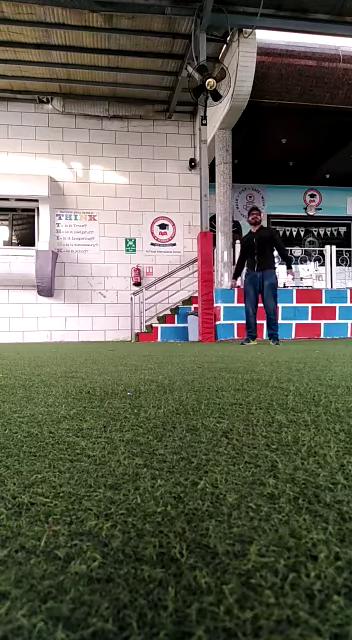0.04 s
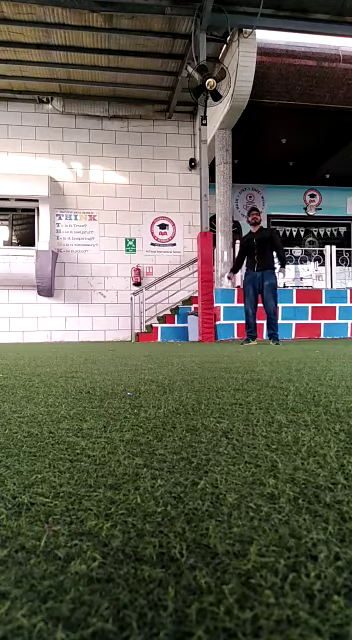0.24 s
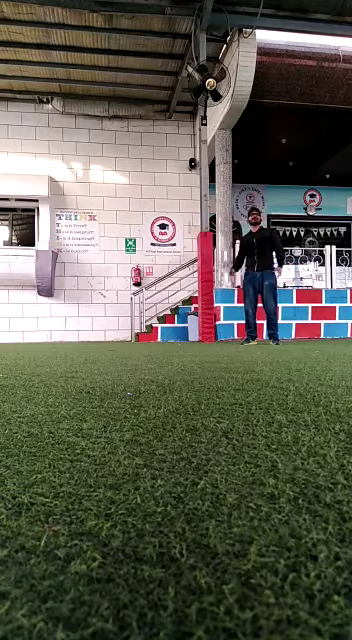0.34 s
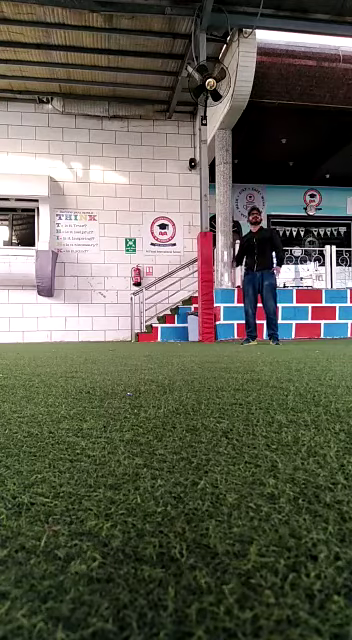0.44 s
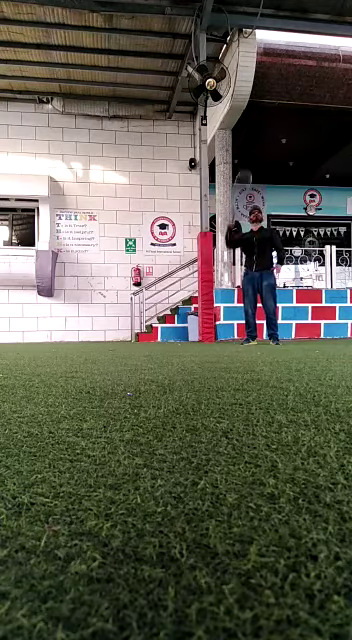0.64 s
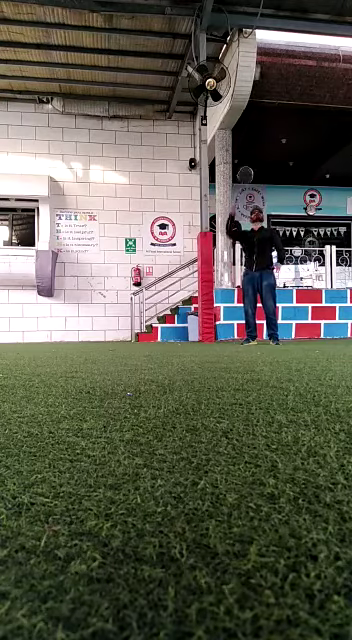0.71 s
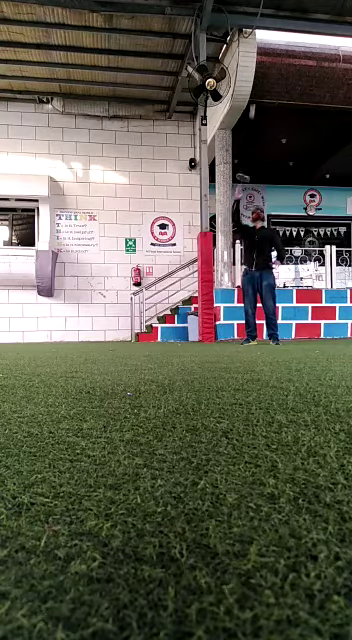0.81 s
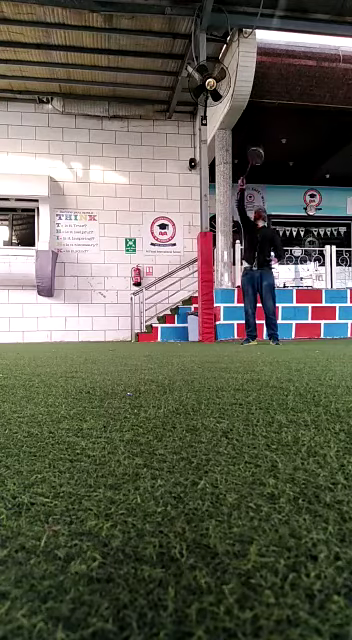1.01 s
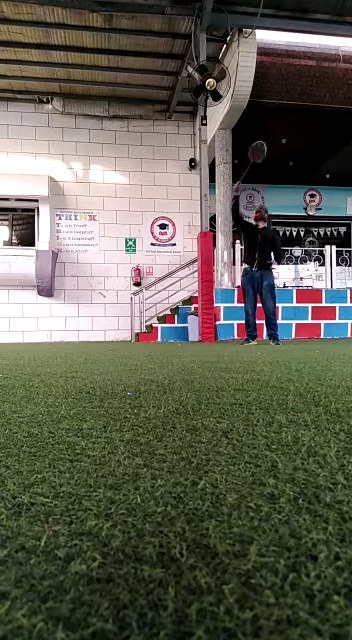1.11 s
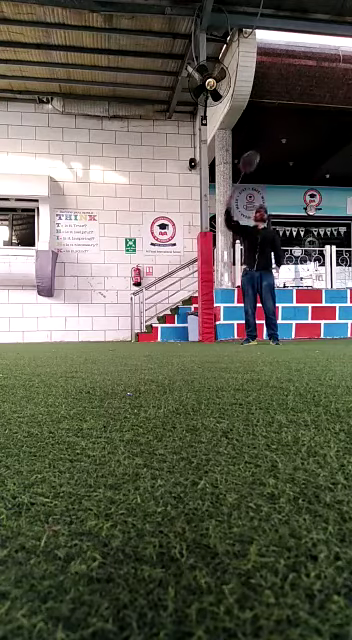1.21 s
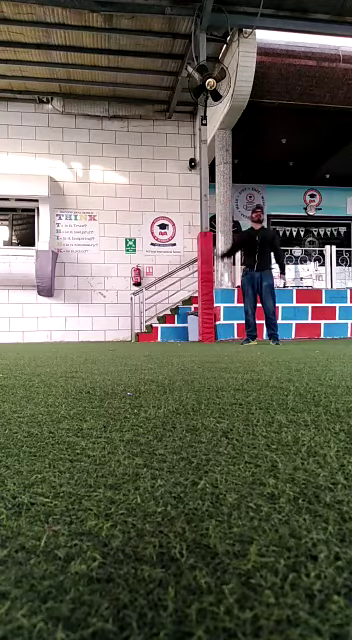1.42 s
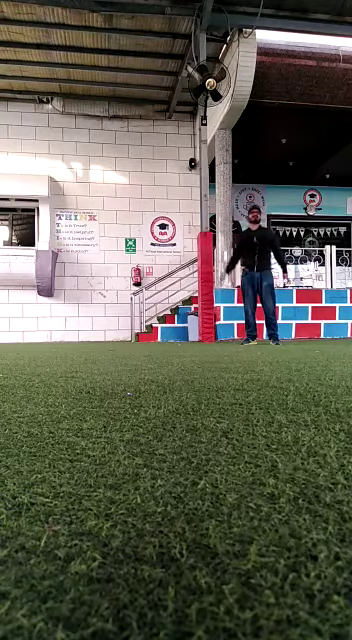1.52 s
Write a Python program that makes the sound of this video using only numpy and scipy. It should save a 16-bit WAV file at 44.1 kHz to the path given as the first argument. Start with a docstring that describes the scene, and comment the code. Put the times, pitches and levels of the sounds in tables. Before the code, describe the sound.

A badminton racket strikes a shuttlecock close by at about 0.2 seconds, just after a faint swish and tick. The sharp crack has a hollow pock and a short ring, and echoes through the hall for about a second. A softer, more distant return comes near 1 second, also echoing. Shoes scuff faintly on turf around 1.3 seconds. A low rumble of distant traffic and fans runs underneath.

```python
"""A badminton hall with a tin roof: a hard stroke close by, then a softer return from across the court.
Each stroke is a crack of cork on strings, a hollow pock and a short ring of the racket, and the hall
echoes it. Rackets swish and tick, shoes scuff the turf, and distant traffic and fans rumble underneath.
The pocks and rings are fading pure tones; the other sounds are shaped noise."""
import sys
import numpy as np
from scipy import signal
from scipy.fft import rfft, irfft, next_fast_len
from scipy.io import wavfile
from scipy.ndimage import uniform_filter1d, map_coordinates

SR = 44100
rng = np.random.default_rng(int(sys.argv[2]) if len(sys.argv) > 2 else 0)


def wav_out(sig):
    """Save sig, one row per channel (or a flat mono array), as 16-bit PCM at SR to the path in sys.argv[1]."""
    wavfile.write(sys.argv[1], SR, np.round(np.clip(np.atleast_2d(sig).T, -1, 1) * 32767).astype(np.int16))


N = 68355
T = np.arange(N) / SR
FFT_SIZE = next_fast_len(N + 8192)
HZ = np.fft.rfftfreq(FFT_SIZE, 1 / SR)

# The tone colour of each sound. Each row: frequency in Hz, boost or cut in dB.
RUMBLE_COLOUR = [(20, -37), (40, -23), (65, -3), (110, 1), (165, -8), (270, 2.5), (400, -5.5), (630, -9),
                 (1000, -15.5), (1500, -21.5), (2000, -29), (2600, -40), (4000, -45), (9000, -47),
                 (14000, -56)]
BOOM_COLOUR = [(40, -30), (75, -6), (110, 0), (135, -4), (180, -25), (500, -60)]
SCUFF_COLOUR = [(500, -15), (1200, -6), (2000, -1), (2700, 0), (4400, -7), (5200, -16), (6000, -8),
                (7200, -4), (8600, -9), (10700, -24), (13000, -45)]
SWISH_COLOUR = [(2000, -14), (4700, -4), (5800, -4), (7000, 0), (9000, -4), (13000, -24)]
TICK_COLOUR = [(1500, -30), (4200, -18), (6400, 0), (8500, 0), (11000, -13), (14000, -22)]
NEAR_CRACK_COLOUR = [(60, -2), (250, 12), (520, 9), (720, 5), (860, 13), (950, 1), (1200, 12), (2000, 6),
                     (2800, 9), (3700, 5), (5600, 9), (6900, 20), (8400, 20.5), (10400, 16), (12000, 4),
                     (13700, -3), (14800, -25)]
NEAR_HALL_COLOUR = [(30, -16), (70, 3), (130, 16), (200, 15), (260, 23), (340, 16), (420, 19), (650, 11),
                    (840, 12), (950, 7), (1200, 11), (1550, 11.5), (2200, 8.5), (2700, 9), (3050, 12),
                    (3300, 5), (3700, -3), (4100, 4), (4700, 2), (5600, 1), (6100, 11), (6900, 13.5),
                    (8400, 12), (10200, 6.5), (12000, -3), (14500, -21)]
SHUDDER_COLOUR = [(30, -35), (300, -10), (600, 7), (950, 0), (1400, 12), (2300, 13), (3200, 11), (3800, -1),
                  (5000, 4), (8000, 3), (13000, -18)]
FAR_CRACK_COLOUR = [(100, -14), (600, 7), (850, 5), (1000, -1), (1250, 6), (1800, -8), (2700, -8),
                    (3200, -26), (4000, -24), (4900, -4), (6000, -5), (7000, 2), (8500, -2), (12000, -11),
                    (14500, -18)]
FAR_HALL_COLOUR = [(30, -14), (100, 4), (300, 10), (600, 4), (950, -2), (1200, 3), (2000, -6), (3000, -3),
                   (3700, -10), (4600, -6), (5500, -6), (7000, 1.5), (9000, -3), (12000, -13), (14500, -22)]
# Swells of noise. Each row: peak time in seconds, level in dB, seconds to rise 20 dB, and to fall 20 dB.
BOOM_SWELLS = [(.15, -46, .06, .06), (.29, -42, .04, .12), (.42, -45, .08, .1), (.69, -42, .06, .25),
               (1.0, -45, .08, .25), (1.3, -43.5, .04, .35)]
SCUFF_SWELLS = [(.035, -67, .02, .03), (.145, -63, .02, .1), (1.18, -53, .03, .04), (1.212, -52, .015, .03),
                (1.278, -43.5, .04, .13)]
SWISH_SWELLS = [(.2, -56, .125, .02), (.78, -65, .12, .08), (.945, -66, .015, .05)]
# Where a sound sits. Each row: frequency in Hz, pan in dB (how much louder the left is than the right).
RUMBLE_PAN = [(100, .5), (300, 2.5), (700, 5), (1400, 8), (2500, 8), (6000, 0)]
HALL_PAN = [(100, .5), (400, 4), (1300, 5), (3000, 3.5), (7000, -1), (10000, 2), (14000, 4)]
# How alike the two ears hear noise. Each row: frequency in Hz, likeness (1 the same, 0 unrelated).
EAR_LIKENESS = [(130, .98), (280, .94), (620, .4), (1350, -.1), (3000, 0)]
# Racket ticks. Each row: start in seconds, level in dB, pan in dB.
RACKET_TICKS = [(.1605, -14, -6), (.775, -29, -3)]
# The strokes. Each holds: start in seconds, crack level and pan in dB, pock delay in seconds, pock pitch
# in Hz, pock level in dB, pock fade in seconds, the hall's slow echo against its quick one in dB.
# A fade (t60) is always the time taken to drop by 60 dB.
NEAR_STROKE = (.2062, -1.3, -2.2, .0061, 275, -13, .0105, -6.5)
FAR_STROKE = (.9699, -1.3, 3, .0004, 380, -20, .007, -2.5)
# Ringing strings and frame. Each row: pitch in Hz, level in dB, fade in seconds.
NEAR_RING = [(860, -31, .1), (1200, -36, .12), (1578, -30.5, .5), (2105, -33, .24), (2600, -36, .15),
             (3025, -27.5, .15), (6050, -33, .17), (6850, -25, .06), (7830, -22, .04), (8190, -25, .06),
             (8420, -22, .04), (10250, -28, .03)]
FAR_RING = [(1160, -36, .17), (1270, -40, .11), (2450, -56, .2), (6630, -47, .12), (7050, -28, .014)]
# Repeats of a crack: cork and feathers meet the strings again, or walls send it back.
# Each row: delay in seconds, level in dB.
STRING_SLAPS = [(.0009, -3), (.0032, -2), (.004, -5)]
WALL_ECHOES = [(.0035, -9), (.009, -11), (.0135, -7), (.016, -8), (.029, -10)]
# The hall's quick and slow echoes. Each row: frequency in Hz, fade in seconds.
QUICK_FADES = [(200, .4), (1500, .4), (7000, .38), (13000, .3)]
SLOW_FADES = [(200, 1.1), (1500, 1.05), (2200, 1.0), (3000, 1.0), (4800, 1.15), (7000, 1.03), (10000, .72),
              (13000, .55)]
# Hiss below these levels is turned down. Each row: frequency in Hz, threshold in dB.
HISS_THRESHOLDS = [(1500, -100), (2000, -80), (2700, -86), (3600, -85), (4700, -92), (6500, -89),
                   (9000, -89), (12000, -92)]

RACKET_PAN_DB = 3


def amp(db):
    """Turn decibels into a number to multiply by."""
    return 10 ** (np.asarray(db) / 20)


def along(points, hz=HZ):
    """Read a table between its rows, on a musical (log) frequency scale."""
    freqs, values = np.transpose(points)
    return np.interp(np.log(hz + 1), np.log(freqs + 1), values)


def pan(db):
    """Left and right gains that keep the total power the same."""
    gains = amp(np.array([[.5], [-.5]]) * db)
    return gains / np.sqrt(np.mean(gains ** 2, axis=0))


def filtered(x, response):
    """Multiply each frequency in x by its own gain."""
    return irfft(rfft(x, FFT_SIZE) * response, FFT_SIZE)[..., :N]


def colour(points):
    """A filter with this tone colour that never sounds ahead of its input."""
    cepstrum = irfft(np.log(amp(along(points))), FFT_SIZE)
    cepstrum[1:FFT_SIZE // 2] *= 2
    cepstrum[FFT_SIZE // 2 + 1:] = 0
    return np.exp(rfft(cepstrum))


def later(x, seconds):
    """Delay a sound."""
    n = int(np.clip(round(seconds * SR), 0, N - 1))
    return np.pad(x, [(0, 0), (n, 0)])[:, :N]


def fade(t60):
    """A level that drops 60 dB every t60 seconds."""
    return np.exp(-np.log(1000) * T / t60)


def unit_energy(x):
    """Scale to an average energy of 1 per channel."""
    return x / np.sqrt(np.mean(np.sum(x ** 2, axis=-1)) + 1e-20)


def room_noise():
    """White noise, alike at both ears in the bass and unrelated in the treble."""
    angle = np.arccos(np.clip(along(EAR_LIKENESS), -1, 1)) / 2
    mid, side = filtered(rng.standard_normal((2, N)), np.array([np.cos(angle), np.sin(angle)]))
    return np.array([mid + side, mid - side])


def rush(points):
    """Steady coloured noise with an average (rms) level of 1."""
    return unit_energy(filtered(room_noise(), amp(along(points)))) * np.sqrt(N)


def swells(rows, points):
    """Noise that swells and fades once for each row."""
    power = sum(amp(db - 20 * np.maximum((peak - T) / rise, (T - peak) / fall)) ** 2
                for peak, db, rise, fall in rows)
    return np.sqrt(power) * rush(points)


def burst(envelope, spikiness=.35):
    """A spiky run of tiny impacts whose level follows the envelope."""
    noise = room_noise()
    flicker = np.interp(T, T[::16], rng.standard_normal(N)[::16])
    impacts = noise * np.exp(spikiness * flicker) * envelope
    return np.array([unit_energy(side) for side in impacts])


def rumble(level_db=-41.8, sway_db=.7, sways_per_s=9):
    """Distant traffic and fans fill the hall with a swaying rumble and deep swells."""
    sway = map_coordinates(rng.standard_normal(64), [T * sways_per_s], mode="mirror")
    steady = amp(level_db + sway_db * sway) * rush(RUMBLE_COLOUR)
    return filtered(steady + swells(BOOM_SWELLS, BOOM_COLOUR), pan(along(RUMBLE_PAN)))


def scuffs_and_swishes():
    """Shoes scuff the turf and rackets swish through the air."""
    movement = swells(SWISH_SWELLS, SWISH_COLOUR) + swells(SCUFF_SWELLS, SCUFF_COLOUR)
    return filtered(movement, pan(along(HALL_PAN)))


def ticks(t60=.011):
    """A racket clicks lightly as it is handled."""
    return sum(amp(db) * pan(pan_db) * later(filtered(burst(fade(t60)), colour(TICK_COLOUR)), start)
               for start, db, pan_db in RACKET_TICKS)


def near_stroke(slap_t60=.007, left_lag_s=.0005, scatter_db=-8, shudder_t60=.095, shudder_rise_s=.004):
    """The hard stroke is a quick run of slaps on the strings, and makes the racket shudder."""
    direct = burst(fade(slap_t60))[:1]
    scattered = amp(scatter_db) * burst(fade(slap_t60))
    slap = np.vstack([later(direct, left_lag_s), direct]) + scattered  # the right ear hears it first
    crack = unit_energy(slap + sum(amp(db) * later(slap, delay) for delay, db in STRING_SLAPS))
    shake = burst(fade(shudder_t60) * (1 - np.exp(-T / shudder_rise_s)))
    shudder = pan(RACKET_PAN_DB) * filtered(shake, colour(SHUDDER_COLOUR))
    hit = stroke(NEAR_STROKE, NEAR_CRACK_COLOUR, NEAR_HALL_COLOUR, NEAR_RING, crack)
    return hit + later(shudder, NEAR_STROKE[0])


def stroke(row, crack_colour, hall_colour, tones, crack, ring_echo_db=-12):
    """Cork meets strings: a crack, a pock and a ringing racket, with the hall's echo."""
    start, crack_db, pan_db, pock_delay, pock_hz, pock_db, pock_t60, slow_db = row
    crack = amp(crack_db) * pan(pan_db) * filtered(crack, colour(crack_colour))
    hollow = later(pock(pock_hz, pock_db, pock_t60), pock_delay)
    ring = sum(amp(db) * fade(t60) * np.sin(2 * np.pi * (hz * T + rng.random((2, 1))))
               for hz, db, t60 in tones)
    echo = filtered(hall(slow_db), colour(hall_colour) + amp(ring_echo_db) * rfft(ring, FFT_SIZE))
    return later(crack + hollow + ring * pan(RACKET_PAN_DB) + echo, start)


def pock(hz, db, t60, pan_db=3.5, roof_delay_s=.0575, roof_db=-10):
    """A low, hollow tone swells and dies at once, then bounces back off the roof."""
    swell = T * fade(t60)
    tone = amp(db) * pan(pan_db) * swell / swell.max() * np.sin(2 * np.pi * hz * T)
    return tone + amp(roof_db) * later(tone, roof_delay_s)


def echo_tail(fades, gap_s=.024, rise_s=.005, size=256):
    """A wash of echoes builds up after a short gap; each frequency dies at its own speed."""
    hz, t, bands = signal.stft(room_noise(), SR, nperseg=size)
    decay = np.exp(-np.log(1000) * t / along(fades, hz)[:, None])
    wash = signal.istft(bands * decay, SR, nperseg=size)[1][:, :N]
    build_up = .5 + .5 * np.tanh((T - gap_s) / rise_s)
    return unit_energy(wash * build_up)


def hall(slow_db):
    """The hall answers a click: a quick echo from near walls and a slow one from the whole roof."""
    echoes = echo_tail(QUICK_FADES) + amp(slow_db) * echo_tail(SLOW_FADES)
    return filtered(unit_energy(echoes), pan(along(HALL_PAN)))


def far_stroke(click_t60=.012):
    """The soft return is one click, repeated by the walls around the player."""
    click = burst(fade(click_t60))
    crack = click + sum(amp(db) * later(click, delay) for delay, db in WALL_ECHOES)
    return stroke(FAR_STROKE, FAR_CRACK_COLOUR, FAR_HALL_COLOUR, FAR_RING, crack)


def suppress_hiss(x, depth_db=-11, size=512):
    """A noise suppressor turns down frequency bands that fall under their threshold."""
    hz, _, bands = signal.stft(x, SR, nperseg=size)
    power = uniform_filter1d(np.abs(bands) ** 2, size=5, axis=1)  # smooth over frequency
    power = np.abs(uniform_filter1d(power, size=5, axis=2))  # then over time
    threshold = amp(along(HISS_THRESHOLDS, hz))[:, None] ** 2
    opening = 1 / (1 + (threshold / (power + 1e-20)) ** 2)
    return signal.istft(bands * amp(depth_db * (1 - opening)), SR, nperseg=size)[1][:, :N]


def scene():
    """Two strokes, the players' movement and the hall's rumble."""
    return near_stroke() + far_stroke() + ticks() + scuffs_and_swishes() + rumble()


def record(dry, low_cut_hz=28, ceiling=.85, top_hz=14600):
    """The recorder trims the deepest bass, quiets hiss, rounds off peaks and cuts the highest treble."""
    trimmed = filtered(dry, (1j * HZ / (low_cut_hz + 1j * HZ)) ** 2)
    quieted = suppress_hiss(trimmed)
    rounded = quieted / (1 + np.abs(quieted / ceiling) ** 6) ** (1 / 6)
    return filtered(rounded, 1 / np.sqrt(1 + (HZ / top_hz) ** 200))


dry = scene()
out = record(dry)
wav_out(out)
```